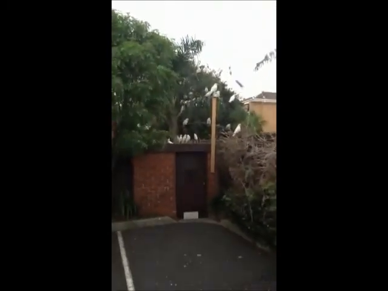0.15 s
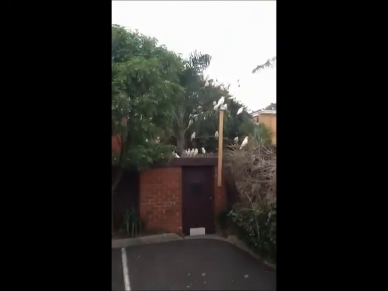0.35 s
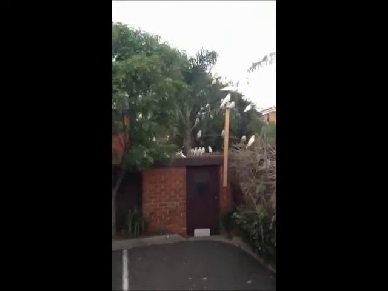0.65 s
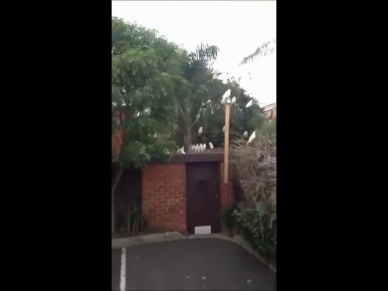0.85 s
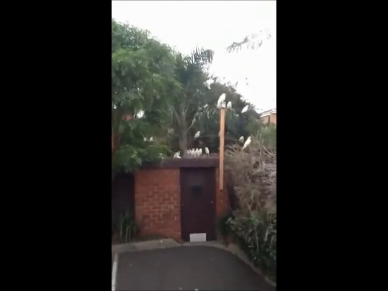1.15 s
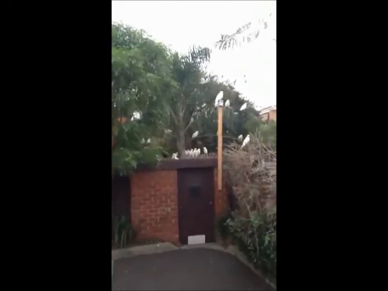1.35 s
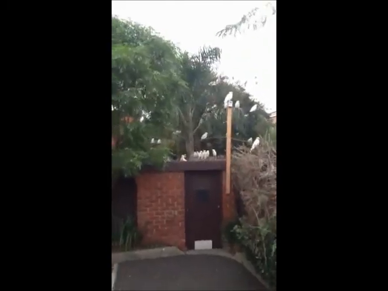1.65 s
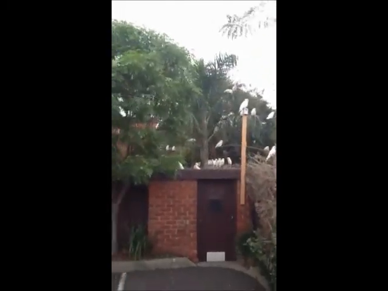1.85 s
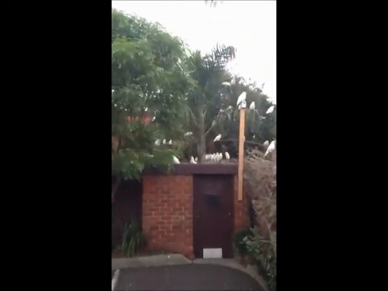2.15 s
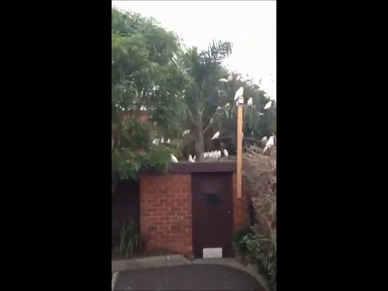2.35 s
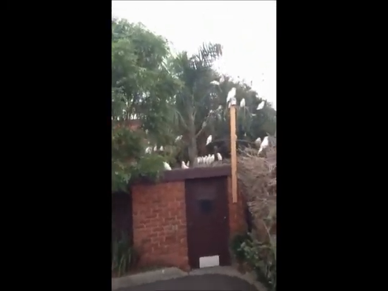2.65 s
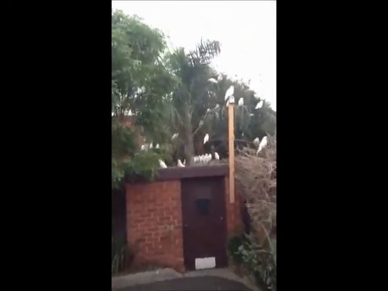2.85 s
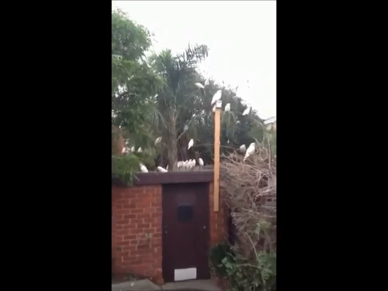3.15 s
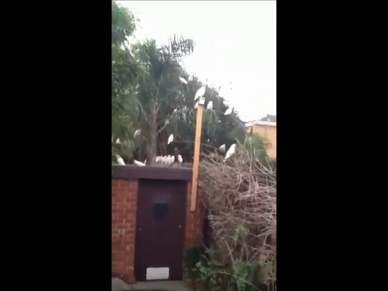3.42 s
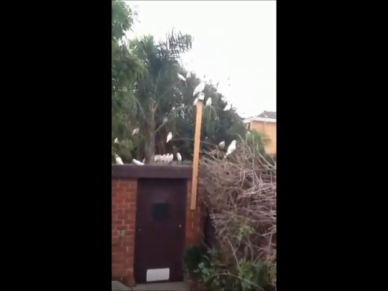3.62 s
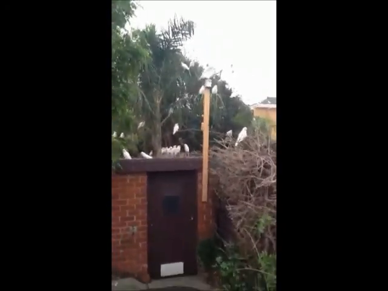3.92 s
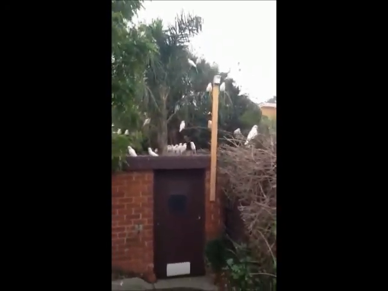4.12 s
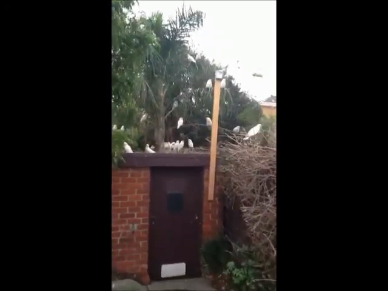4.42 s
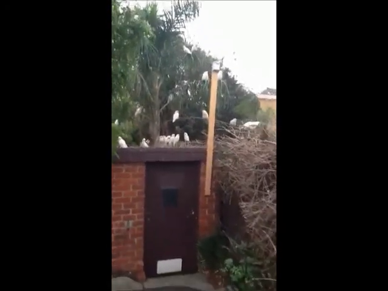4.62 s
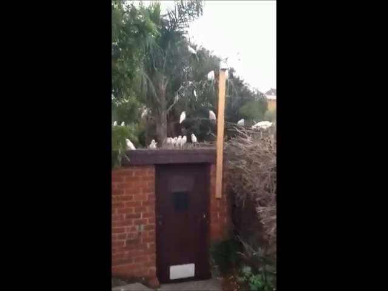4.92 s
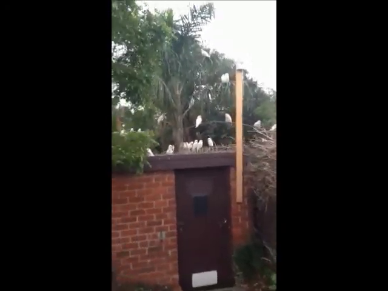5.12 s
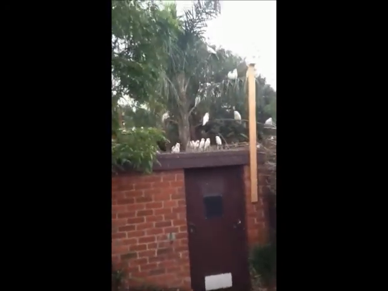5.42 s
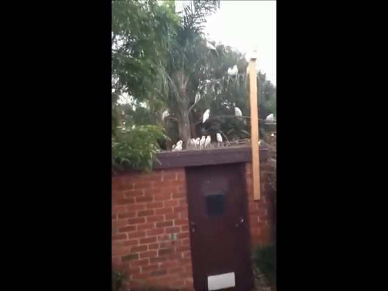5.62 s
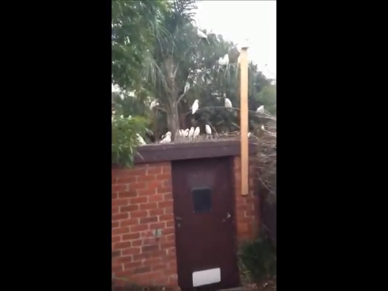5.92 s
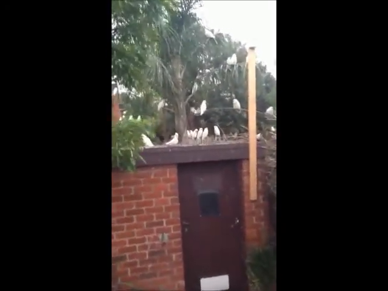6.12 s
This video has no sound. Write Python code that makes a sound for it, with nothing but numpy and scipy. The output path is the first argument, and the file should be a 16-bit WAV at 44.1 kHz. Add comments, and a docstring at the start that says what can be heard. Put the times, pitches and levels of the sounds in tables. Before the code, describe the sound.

A dense, squabbling parrot flock outdoors. It opens with a warbling nasal cry, then overlapping yelps, quavers and rough screeches, with distant birds filling every gap. A harsh, long screech bursts out midway, followed by a tight cluster of loud calls and a bright, strong wail, then more rasping and warbling until it cuts off mid-clamour. Short dull reflections, faint steady background hush, mono phone-like sound.

```python
"""Corellas call from the trees and a shed roof beside a car park.
Near birds give quavering nasal wails and warbling cries, built from a buzz of harmonics and a beak resonance,
and harsh screeches, built from uneven pulses and puffs of noise ringing in throat and beak.
Further off, thirteen birds chatter behind them in short quavering cries of the same buzz.
Walls and foliage scatter the calls over a faint, steady hush of the town: noise strongest around 1.5 kHz."""
import sys
import numpy as np
from scipy import signal
from scipy.fft import rfft, irfft, next_fast_len
from scipy.io import wavfile
from scipy.ndimage import uniform_filter1d

SR = 44100
rng = np.random.default_rng(int(sys.argv[2]) if len(sys.argv) > 2 else 0)


def bounce(signal):
    """Save signal as a 16-bit WAV file at the path given by the first command-line argument."""
    frames = np.transpose(np.atleast_2d(signal))
    limited = np.clip(frames, -1, 1)
    pcm = np.round(limited * 32767).astype(np.int16)
    wavfile.write(sys.argv[1], SR, pcm)


N = 276507

WAIL_ATTACK_SHARE = 0.14   # part of a wail spent building breath pressure
WAIL_RELEASE_S, WAIL_SLACK_GAIN_DB = 0.02, 0.5   # time for the pressure to let go; slight lift without it
WAIL_DROOP = 0.029   # share of pitch lost as the pressure lets go

# Short wails from the near birds, before flutter: (start [s], length [s], first pitch [Hz], last pitch [Hz],
# quavers in the call [count], quaver depth [share of pitch], level [dB], crescendo [dB over the call],
# treble lift [dB], beak resonance [Hz], roughness [0-1])
NEAR_WAILS = [ (.13, 0.15, 722, 688, 1.15, 0.0055, -28, -2, 5, 2100, 0.07),
              (0.282, .11, 690, 735, 0.92, 0.016, -33.5, -12, -7, 3300, .5),
              (0.393, 0.063, 881, 850, 0.73, 0.018, -33.5, -9, -27, 2560, 0.35),
              (.495, 0.038, 820, 855, 0.61, 0.018, -25, 8.5, -21, 2500, 0.16),
              (0.854, 0.07, 811, 678, 0.74, 0.02, -32.5, 9, 5, 1487, 0.16),
              (1.249, 0.05, 887.3, 870, 0.97, 0.018, -26, 6, 11, 2690, 0),
              (1.311, 0.021, 910, 917, 0.96, 0.01607, -24.5, 7, 0, 1810, 0.2),
              (1.35, 0.033, 867, 910, 1.04, 0.014, -24, 12, -5, 2670, 0.08),
              (1.515, 0.044, 864, 857, 1.2, 0.031, -26.5, 0, 5, 2620, 0.03),
              (1.62, 0.034, 870, 910, 1.25, 0.016, -26, 1, -2, 2740, 0),
              (2.038, 0.22, 733, 730.5, 2.05, 0.016, -30, -3, 1, 1800, 0.32),
              (2.355, 0.1, 743, 759, 1.04, 0.03, -30, -8.5, -3, 2542, 0.01),
              (2.442, 0.16, 707, 739, 2.3, 0.012, -37, 5, 12, 3000, 0.3),
              (2.514, 0.051, 805, 779, 1.05, 0.0067, -27.5, 4, 8, 2410, 0.33),
              (2.562, 0.36, 703, 729, 4.15, 0.019, -31, -0.5, 13, 2090, 0.19),
              (2.633, 0.1, 716, 711, 1, 0.0035, -36, 3, -10, 2150, 0.12),
              (3.015, 0.046, 734, 807, 1.06, 0.0064, -31.5, -1, 17, 2250, 0.25),
              (3.892, 0.14, 678, 660, 1.14, 0.014, -28.5, -1, 8, 3350, 0.25),
              (4.309, 0.086, 714, 713, 0.74, 0.0086, -23.5, -6, 11, 3550, 0.14),
              (4.314, .13, 745, 760, 1.03, 0.028, -26.5, -2, -10, 2270, 0.12),
              (4.462, 0.057, 879, 872, 1.05, 0.0093, -24.5, -7, 17, 4370, 0.08),
              (5.124, 0.37, 723, 731, 5.4, 0.018, -30, -6, 8, 2180, 0.16),
              (5.613, 0.2, 691.4, 685.6, 1.94, 0.02, -26, 1, -8, 2550, 0.13),
              (5.98, .11, 687, 691, 0.73, 0.0051, -27.5, -11, 6, 4800, 0), ]
# Throat and beak colour of a wail: (frequency [Hz], level [dB])
WAIL_COLOUR = [(450, -11), (720, -12.5), (1100, -3.5), (1500, -7), (1850, -2.5), (2250, 3.5), (2800, -2.5),
               (3600, -6), (4500, -12), (6600, -13.5), (8300, -23.5), (11000, -31), (15000, -49)]


def wail(start_s, length_s, first_hz, last_hz, quavers, depth, level_db, crescendo_db, bright_db, beak_hz,
         rough, flutter_db=1.36, beak_db=5):
    """A near nasal cry: the membrane's pitch glides and quavers, and one beak resonance stands out."""
    at, progress, slack, fade = breath(start_s, length_s, WAIL_ATTACK_SHARE * length_s, WAIL_RELEASE_S)
    crest = -np.cos(2 * np.pi * quavers * progress)
    glide_hz = first_hz + (last_hz - first_hz) * progress
    hz = glide_hz * (1 + depth * crest - WAIL_DROOP * slack * progress)
    db = level_db + crescendo_db * (progress - .5) + WAIL_SLACK_GAIN_DB * slack
    db = db + flutter_db * drift(len(at), 95.0)
    voice = resonance(colour(membrane(hz, rough), WAIL_COLOUR), beak_hz, beak_db)
    return at, brighten(voice, bright_db) * fade * from_db(db)


# Warbling cries of the nearest birds, before flutter: (roughness [0-1], treble lift [dB], beak lift [dB],
# upper resonance [Hz], its lift [dB], course as rows of
# (time [s], pitch [Hz], level [dB], beak resonance [Hz]))
NEAREST_CRIES = [ (0.052, -3.5, 10.4, 6200, 7, [(0, 830, -25, 2480), (.032, 776, -18, 2300),
                 (.06, 757, -23.5, 2290), (.12, 780, -21, 2300), (.18, 761, -26.5, 2280),
                 (.232, 726, -25, 2200), (.268, 714, -23.5, 2150), (.29, 685, -31, 2100)]),
                 (0.302, 0.5, 8.5, 4700, 3, [(.725, 728.6, -27, 2400), (.76, 798, -23.5, 2372),
                 (.81, 733.5, -26, 2892), (.865, 802, -19.5, 2450), (.915, 730, -23, 2900)]),
                 (.27, 1.5, 6.1, 6000, 3, [(.945, 791, -38, 2400), (.985, 745, -26.5, 3000),
                 (1.035, 791, -20, 2470), (1.065, 736, -50, 2400), (1.1, 778, -28.5, 3040),
                 (1.145, 760, -27.5, 3060), (1.18, 717, -22.5, 2880), (1.2, 772.4, -23, 2427),
                 (1.225, 739, -27.5, 2330), (1.265, 803, -17.5, 2407), (1.3, 774, -32, 2400)]),
                 (.3, 4, 5.9, 5200, 9, [(.94, 873, -26, 3700), (.965, 905, -30, 3708),
                 (.99, 967, -26, 3900), (1.02, 943, -40, 3800), (1.045, 933, -23, 3700),
                 (1.067, 872, -33, 3600), (1.1, 934, -20.5, 2770), (1.14, 882, -33, 2670),
                 (1.185, 810, -41, 3400)]), (0.01, 5, 13.5, 2200, 7, [(1.31, 712.5, -32, 3500),
                 (1.42, 691.5, -26, 3420), (1.47, 728, -26, 4270), (1.5, 693.5, -27.5, 3500),
                 (1.54, 680, -32, 3380), (1.575, 734, -26, 4170), (1.63, 684, -26.5, 3400),
                 (1.68, 660, -26, 1970), (1.725, 789, -28, 3124), (1.77, 683, -33, 2070),
                 (1.81, 760, -36, 2880), (1.83, 731, -42, 2930)]),
                 (0.463, -3, 5.2, 4600, 3, [(1.835, 790, -43, 2400), (1.86, 783, -25, 2413),
                 (1.89, 840.4, -24, 2450), (1.94, 728, -20, 2900), (1.968, 798, -24.5, 3920),
                 (2.01, 729, -18.5, 2820), (2.05, 770, -26, 2290)]),
                 (0.038, -12, 5.7, 1800, 5, [(2.63, 764, -55, 2400), (2.67, 814, -23.5, 2450),
                 (2.73, 799, -23.5, 2420), (2.78, 767, -40, 2350), (2.81, 714, -44, 2200)]),
                 (.04, -1, 4.8, 5750, 5.5, [(3.895, 818, -24, 2400), (3.92, 812, -21.5, 2400),
                 (3.95, 755, -16.5, 2360), (3.975, 780, -20.5, 2330), (4.005, 741, -23, 2250),
                 (4.035, 744, -23, 2260), (4.062, 786, -18, 3060), (4.088, 710, -24, 2790),
                 (4.103, 682, -22.5, 2100)]), (0.17, -8, 5.48, 2000, 3.6, [(4.15, 797, -24, 2400),
                 (4.195, 746.5, -27, 2250), (4.24, 824, -16.5, 2450), (4.27, 895, -21, 2700),
                 (4.3, 808, -24, 2400)]), (.05, 6, 7.7, 4700, 5, [(4.725, 763.6, -16.5, 3880),
                 (4.788, 776, -15, 2360), (4.82, 744.3, -15.5, 3800), (4.866, 742, -14.5, 3748),
                 (4.892, 738, -17, 3700), (4.915, 721, -16.5, 2180), (4.965, 710.5, -16.5, 2150),
                 (4.994, 704, -21.5, 3540), (5.026, 692.6, -19, 3500), (5.056, 693, -20.5, 3370),
                 (5.068, 638, -21, 3290)]), (0.015, 1, 8.6, 4940, 3, [(5.55, 734, -23, 2190),
                 (5.6, 726.5, -24.5, 1480), (5.66, 713, -22.5, 1450), (5.7, 718.4, -19.5, 2160),
                 (5.77, 699, -22, 2100), (5.85, 674, -23, 2050), (5.89, 646, -21, 4400)]),
                 (0.182, -0.5, 9.3, 6400, 2, [(5.785, 750, -23, 2290), (5.822, 807, -22, 2394),
                 (5.87, 725, -20, 2220), (5.92, 800, -18, 2400), (5.95, 771, -20.5, 2390),
                 (5.98, 696, -19, 4950)]), (0.45, 6.5, 11, 5100, -1, [(6.135, 785, -24, 2400),
                 (6.165, 847, -19.5, 2500), (6.19, 945, -23.5, 2800), (6.212, 817, -16.5, 3250),
                 (6.235, 778, -28, 2380), (6.27, 862, -31, 2627)]), ]
# Throat and beak colour of a near cry: (frequency [Hz], level [dB])
CRY_COLOUR = [(450, -20), (740, -10.5), (1100, 0.5), (1500, -4), (1850, -4.5), (2250, 1.5), (2800, -0.5),
              (3600, -5), (4500, -7.5), (6600, -9.5), (8400, -17), (11000, -24.5), (15000, -38)]


def cry(rough, bright_db, beak_db, upper_hz, upper_db, course, flutter_db=1.0):
    """A long wail whose pitch, effort and beak opening swing; the beak picks out one harmonic after another."""
    start_s, end_s = course[0][0], course[-1][0]
    at, _, _, fade = breath(start_s, end_s - start_s, 0, 0)
    s, *columns = np.transpose(course)
    hz, db, beak_hz = (uniform_filter1d(np.interp(at / SR, s, column), size=700, mode="nearest")
                       for column in columns)
    voice = resonance(colour(membrane(hz, rough), CRY_COLOUR), beak_hz, beak_db)
    voice = brighten(resonance(voice, upper_hz, upper_db), bright_db)
    # even out the loudness before the course shapes it
    voice = voice / np.sqrt(uniform_filter1d(voice ** 2, size=1000))
    return at, voice * fade * from_db(db + flutter_db * drift(len(at), 88.6))


SCREECH_RELEASE_S, SCREECH_SLACK_DB = 0.043, 10   # time for the pressure to let go; level lost without it
SCREECH_DULLING_DB = 5.5   # treble lost at slack pressure
SCREECH_ARCH = .012   # share by which its pitch lifts in mid-call
BEAK_WANDER, BEAK_WANDER_PER_S = 0.013, 32.4   # the resonances waver by this share, this often
RASP_AIR = .45   # rush of air beside the pulses (gain)

# Screeches from the near birds, before the rattle and the mix trim: (start [s], length [s],
# first pitch [Hz], last pitch [Hz], attack [s], level [dB], crescendo [dB over the call],
# treble lift at full pressure [dB], timing jitter [share of a cycle], lower resonance [Hz],
# upper resonance [Hz], lift of each [dB], sinking of both as the beak closes [share; negative rises],
# ring of the fundamental [dB])
NEAR_SCREECHES = [ (0.451, 0.46, 1333, 1253, 0.048, -28.5, 2.5, 4.5, 0.11, 2620, 4080, 8, 0, 2),
                  (1.247, 0.26, 1193, 1174, 0.019, -25.5, -4, 13, 0.27, 2632, 3797, 12, .02, -17),
                  (1.884, 0.22, 1156, 1137, 0.021, -32.5, 9, 10, .3, 2200, 2900, 1, .04, -13),
                  (2.477, 0.13, 1237, 1188, .046, -25.5, -10, 6, 0.25, 3200, 3940, 20, .04, -7),
                  (3.08, 0.4, 1314, 1312, 0.059, -24.5, 8, 4, 0.082, 2780, 3900, 11, 0, -8),
                  (3.408, 0.5, 1149, 1108, 0.11, -15, -3, 6.5, 0.24, 2440, 4260, 7, 0.11, -2),
                  (4.123, 0.21, 1116, 1164, 0.052, -17, -7, 3.5, 0.18, 2300, 3520, 6.5, .026, 0.5),
                  (4.283, 0.34, 1105, 1083, 0.011, -17.5, -6.5, 2.5, 0.19, 2380, 4570, 8, .05, 0),
                  (4.608, .15, 1193, 1187, 0.093, -15.5, -3, 5, 0.297, 3450, 4800, 2.5, .015, -8),
                  (4.743, 0.34, 1174, 1142, 0.048, -24, -3, 4, 0.25, 2700, 3544, 9, 0.0056, 7),
                  (5.116, .25, 1162, 1181, 0.085, -26, -10, 12.5, .14, 3305, 4900, 8.5, -.013, 9.5),
                  (5.432, 0.71, 1186, 1120, .06, -23, -5.5, 5.5, 0.23, 2200, 3520, 5.5, 0.053, -3),
                  (6.19, 0.11, 1255, 1194, 0.023, -20.5, 4, 8, 0.37, 2580, 5164, 1, .05, -14), ]
# Throat and beak colour of a screech: (frequency [Hz], level [dB])
SCREECH_COLOUR = [(300, -18.5), (570, -20), (780, -14.5), (950, -9), (1140, -2), (1400, -2.5), (1950, -7.5),
                  (2350, -.5), (3300, -2.5), (4700, -6.5), (6900, -11.5), (8200, -14.5), (11500, -27),
                  (15000, -38)]
# How erratic the membrane is during the loudest screech: (time [s], chaos [0 = steady limp, 1 = chaos])
MEMBRANE_CHAOS = [(3.49, 1), (3.54, .16), (3.69, .26), (3.75, .65), (3.87, .75), (3.92, 1)]


def screech(start_s, length_s, first_hz, last_hz, attack_s, level_db, crescendo_db, bright_db, jitter,
            lower_hz, upper_hz, beak_db, sink, root_db, waver=.003, rattle_db=0.93):
    """Driven hard, the membrane slaps unevenly; pulses and their rush of air ring in throat and beak."""
    at, progress, slack, fade = breath(start_s, length_s, attack_s, SCREECH_RELEASE_S)
    size = len(at)
    glide_hz = first_hz + (last_hz - first_hz) * progress
    hz = glide_hz * (1 + SCREECH_ARCH * np.sin(np.pi * progress) + waver * drift(size, 40.84))
    db = level_db + crescendo_db * (progress - .5) - SCREECH_SLACK_DB * slack
    chaos = np.interp(at / SR, *np.transpose(MEMBRANE_CHAOS))
    pulses = windpipe(slaps(hz, jitter, chaos))
    source = pulses + RASP_AIR * rasp(np.cumsum(hz) / SR)
    voice = resonance(colour(source, SCREECH_COLOUR), hz, root_db, width_hz=170)
    for centre_hz in (lower_hz, upper_hz):
        sag = 1 - sink * (progress - .5) + BEAK_WANDER * drift(size, BEAK_WANDER_PER_S)
        voice = resonance(voice, centre_hz * sag, beak_db, width_hz=230)
    # each surge of the rattle is both louder and brighter
    surge_db = rattle_db * drift(size, 177.0)
    voice = brighten(voice, bright_db - SCREECH_DULLING_DB * slack + surge_db)
    return at, voice * fade * from_db(db + surge_db / 2)


# The limp into which the membrane locks, repeating every four beats: (lateness [share of a cycle])
LIMP = [.137, -.084, .048, -.102]


def slaps(hz, jitter, chaos, memory=0.841, force_db=3.0):
    """The membrane snaps shut once a cycle, early or late: in chaos that half repeats, or in a steady limp."""
    cycles, beats = np.cumsum(hz) / SR, len(LIMP)
    beat = np.arange(int(cycles[-1]))
    chance = np.random.default_rng(rng.integers(1 << 30)).standard_normal((len(beat), 2))
    # each beat remembers the one a whole limp earlier
    feedback = np.r_[1, np.zeros(beats - 1), -memory]
    erratic = rms_one(signal.lfilter([1], feedback, chance[:, 0]))
    wild = np.clip(np.interp(beat, cycles, chaos), 0, 1)
    late = wild * jitter * erratic + np.sqrt(1 - wild ** 2) * np.array(LIMP)[beat % beats]
    where = np.interp(beat + late, cycles, np.arange(len(hz)))
    whole, force = where.astype(int), -from_db(force_db * chance[:, 1])
    # share each pulse between the two nearest samples
    out = np.zeros(len(hz) + 1)
    np.add.at(out, whole, force * (1 - where % 1))
    np.add.at(out, whole + 1, force * (where % 1))
    return rms_one(out[:-1] - out.mean())


def windpipe(x, hz=3600, width_hz=2500):
    """The windpipe, an all-pass, smears each sharp pulse into a short ring without changing its colour."""
    r = np.exp(-np.pi * width_hz / SR)
    poles = [1, -2 * r * np.cos(2 * np.pi * hz / SR), r * r]
    return signal.lfilter(poles[::-1], poles, x)


WAIL_TREMOR = 0.0401   # pitch tremor of a wail or cry as a share of pitch, at full roughness
LEAF_FLICKER, ROUGH_FLICKER = 0.31, 0.55   # swell and fade of each harmonic (log gain); more if rough


def membrane(hz, rough):
    """The buzz behind a wail or cry; roughness shakes its pitch and adds air."""
    hz = hz * (1 + WAIL_TREMOR * rough * drift(len(hz), 70.44))
    cycles = np.cumsum(hz * (1 + .035 * rough * drift(len(hz), 450))) / SR
    flicker = min(LEAF_FLICKER + ROUGH_FLICKER * rough, .7)
    return syrinx(cycles, count=21, flicker=flicker) + .5 * rough * rasp(cycles)


def syrinx(cycles, count=19, flicker=0.42):
    """A buzz of harmonics; each swells and fades a little, as the bird moves among reflecting leaves."""
    out = np.zeros(len(cycles))
    for k in range(1, count + 1):
        strength = np.exp(min(.11 * k, flicker) * drift(len(cycles), 24))
        out += strength * np.sin(2 * np.pi * (k * cycles + rng.random()))
    return rms_one(out)


def rasp(cycles, depth=0.81):
    """Turbulent air, let through in puffs by the membrane."""
    return rms_one(rng.standard_normal(len(cycles)) * (1 + depth * np.cos(2 * np.pi * cycles)))


def breath(start_s, length_s, attack_s, release_s, edge_s=.01):
    """Breath of a call: sample positions, progress 0-1, slackness (0 at full pressure, 1 slack), edge fade."""
    first = max(int((start_s - edge_s) * SR), 0)
    at = np.arange(first, min(int((start_s + length_s + edge_s) * SR), N))
    since, left = at / SR - start_s, start_s + length_s - at / SR
    pressure = np.minimum(since / max(attack_s, 1e-3), left / max(release_s, 1e-3))
    slack = 1 - np.clip(pressure, 0, 1)
    fade = np.clip(np.minimum(since, left) / edge_s + 1, 0, 1) ** 2
    return at, since / length_s, slack, fade


def resonance(x, hz, db, width_hz=500):
    """Lift the band around one resonance of throat or beak, steady or moving; unit power out."""
    turn = np.exp(2j * np.pi * np.cumsum(hz * np.ones(len(x))) / SR)
    r = np.exp(-np.pi * width_hz / SR)
    # shift the resonance down to 0 Hz, smooth, and shift back
    band = 2 * np.real(turn * signal.lfilter([1 - r], [1, -r], x / turn))
    return rms_one(x + (from_db(db) - 1) * band)


def brighten(x, db, split_hz=3900):
    """A wider beak lifts the treble at equal power."""
    low = signal.sosfiltfilt(signal.butter(2, split_hz, fs=SR, output="sos"), x)
    high, gain = x - low, from_db(db)
    power = np.mean(low ** 2) + 2 * gain * np.mean(low * high) + gain ** 2 * np.mean(high ** 2)
    return (low + gain * high) / np.sqrt(power)


def perform(call, table):
    """Lay every call of one kind on the time line."""
    out = np.zeros(N)
    for row in table:
        at, sound = call(*row)
        out[at] += sound
    return out


# The flock further back swells and settles, before the mix trim: (time [s], level [dB])
FLOCK_LEVEL = [(0, -27), (.25, -32), (.4, -29), (.55, -32.5), (.75, -25), (1.1, -29.5), (1.4, -24.5),
               (1.65, -31), (1.9, -25.5), (2.3, -30), (2.8, -25), (3, -30.5), (3.3, -28), (3.7, -20),
               (3.92, -28.5), (4.08, -23), (4.2, -22), (4.4, -25.5), (6.27, -27)]
# Colour of the distant voices: (frequency [Hz], level [dB])
FLOCK_COLOUR = [(300, -59), (550, -9.5), (760, -11), (1050, -5.5), (1500, -10.5), (1900, -4.5), (2280, 2.5),
                (2800, -1), (3600, -7), (5000, -10), (7000, -17), (9500, -22.5), (12000, -27.5),
                (15000, -26)]


def flock(count=13, pitch_hz=765, wander=.07, quaver=.045, murmur=0.18, air=0.51):
    """Birds further off come and go with short cries, each quavering about a wandering pitch."""
    out = np.zeros(N)
    for _ in range(count):
        bend = wander * drift(N, 5) + quaver * drift(N, 28) + .011 * drift(N, 500)
        cycles = np.cumsum(pitch_hz * np.exp(bend)) / SR
        calling = np.clip(3 * drift(N, 12) - .5, 0, 1)
        out += (syrinx(cycles, count=12) + air * rasp(cycles)) * (calling + murmur)
    voices = colour(out, FLOCK_COLOUR)
    voices /= np.sqrt(uniform_filter1d(voices ** 2, SR // 6))
    return voices * from_db(np.interp(np.arange(N) / SR, *np.transpose(FLOCK_LEVEL)))


# Reflections from ground, shed and fence, against the direct sound: (delay [s], level [dB])
REFLECTIONS = [(.0023, -34), (.0071, -66), (.031, -17.5), (.058, -10.5)]


def car_park(x, scatter_db=-13, t60=0.16, dull_hz=5000):
    """A few hard reflections and a short, dull scatter (decaying noise) from the trees."""
    t = np.arange(SR // 2) / SR
    tail = rng.standard_normal(len(t)) * from_db(-60 * t / t60)
    tail = signal.sosfilt(signal.butter(1, dull_hz, fs=SR, output="sos"), tail)
    response = from_db(scatter_db) * tail / np.sqrt(np.sum(tail ** 2))
    response[0] += 1   # the direct sound
    for delay_s, db in REFLECTIONS:
        response[int(delay_s * SR)] += from_db(db)
    return signal.fftconvolve(x, response)[:N]


# Colour of the town's hush, strongest around 1.5 kHz: (frequency [Hz], level [dB])
TOWN_COLOUR = [(25, -30), (65, -23), (90, -13), (140, -9.5), (200, -0.5), (250, -5.5), (400, -2),
               (600, -14), (1500, 9.5), (8000, -50)]


def town(level_db=-41):
    """The town's faint, steady hush: coloured noise strongest around 1.5 kHz."""
    return from_db(level_db) * colour(rng.standard_normal(N), TOWN_COLOUR)


def colour(x, spectrum):
    """Pass a sound through a (Hz, dB) response; unit power out."""
    size = next_fast_len(len(x) + SR // 20)
    hz, db = np.transpose(spectrum)
    bins = np.maximum(np.arange(size // 2 + 1) * SR / size, 1)
    gain = from_db(np.interp(np.log(bins), np.log(hz), db))
    gain = gain * np.minimum(bins / hz[0], 1) ** 2   # falls away below the first point
    return rms_one(irfft(rfft(x, size) * gain, size)[:len(x)])


def drift(size, rate):
    """Smooth chance of spread 1 that takes a new value rate times a second."""
    steps = np.arange(size) * rate / SR
    values = np.random.default_rng(rng.integers(1 << 30)).standard_normal(int(steps[-1]) + 2)
    return rms_one(np.interp(steps, np.arange(len(values)), values))


def rms_one(x):
    """Scale to unit power."""
    return x / np.sqrt(np.mean(x ** 2) + 1e-20)


def from_db(db):
    """Decibels to gain."""
    return 10 ** (np.asarray(db) / 20)


def scene(screech_db=-1.5, flock_db=-1.0):
    """Near birds and the flock behind them in the car park, over the town."""
    near = perform(wail, NEAR_WAILS) + perform(cry, NEAREST_CRIES)
    near = near + from_db(screech_db) * perform(screech, NEAR_SCREECHES)
    birds = near + from_db(flock_db) * flock()
    return (car_park(birds) + town())[None]


def record(dry):
    """The highest peaks are rounded; the small microphone loses the deep bass, and the top is cut."""
    low_pass = signal.ellip(10, .2, 80, 15400, fs=SR, output="sos")
    high_pass = signal.butter(2, 55, "high", fs=SR, output="sos")
    rounded = dry / (1 + (dry / .85) ** 6) ** (1 / 6)
    return signal.sosfilt(low_pass, signal.sosfilt(high_pass, rounded))


dry = scene()
out = record(dry)
bounce(out)
```